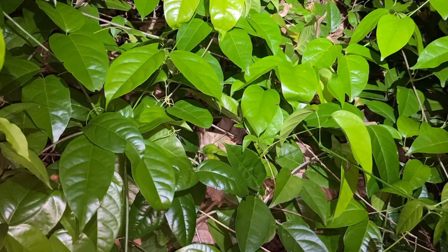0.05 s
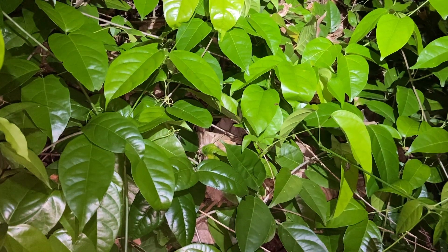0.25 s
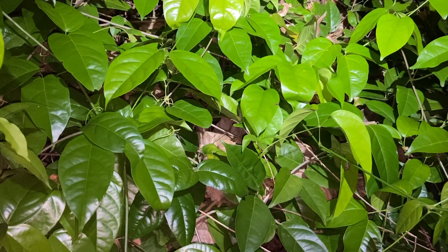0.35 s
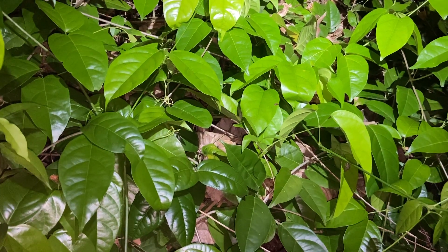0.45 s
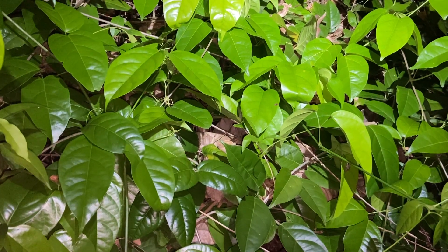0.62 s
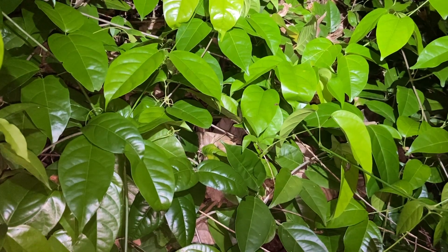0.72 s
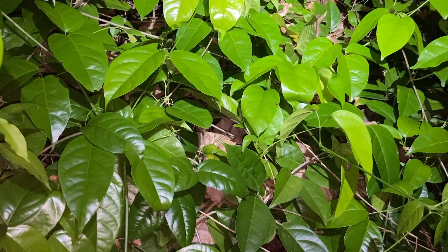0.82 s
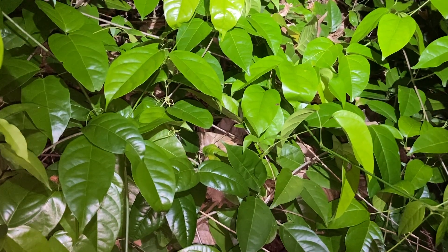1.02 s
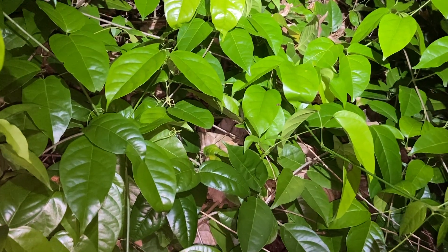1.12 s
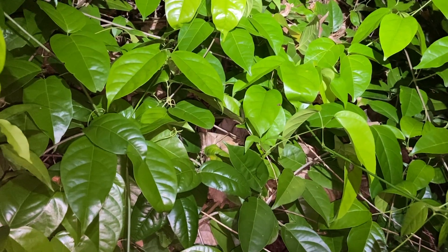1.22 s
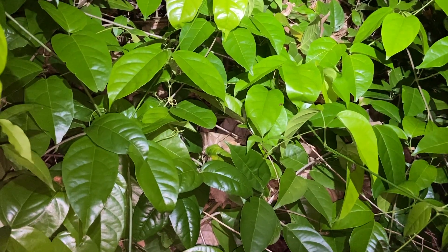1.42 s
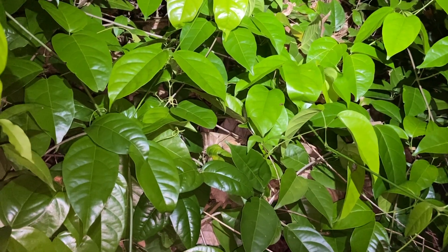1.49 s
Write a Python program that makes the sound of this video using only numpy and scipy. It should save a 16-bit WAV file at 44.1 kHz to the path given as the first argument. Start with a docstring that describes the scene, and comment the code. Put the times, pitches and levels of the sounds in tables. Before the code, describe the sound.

Small frogs whistle among foliage outdoors. One close to the microphone gives a low note, then a louder rising one. Others keep calling from farther off, over a distant chorus and steady high insect buzzing.

```python
"""Tree frogs at night

A frog close by whistles one call with its vocal sac: a nearly flat low note, then a louder rising one.
Other frogs give the same notes from farther off, smeared by leaves and trunks, over a blurred far chorus.
Insects rasp their wings in the treble. Faint hoots and taps, a low rumble and a hum lie underneath."""
import sys
import numpy as np
from scipy import signal
from scipy.fft import rfft, irfft, next_fast_len
from scipy.io import wavfile
from scipy.ndimage import uniform_filter1d, map_coordinates

SR = 44100
rng = np.random.default_rng(int(sys.argv[2]) if len(sys.argv) > 2 else 0)


def master_out(mix):
    """Clip the mix to full scale and print it as 16-bit PCM to the path in sys.argv[1]."""
    frames = np.transpose(np.atleast_2d(mix))
    ceiling = np.clip(frames, -1, 1)
    pcm = np.round(ceiling * 32767).astype(np.int16)
    wavfile.write(sys.argv[1], SR, pcm)


N = 68355


# The near frog's two notes. Each row: time in seconds, pitch in Hz, level in dB.
NEAR_LOW_NOTE = [(.2165, 2130, -44), (.219, 2065, -18.5), (.222, 2045, -15.3), (.228, 2003, -16.8),
                 (.241, 1995, -19.8), (.249, 1945, -24.8), (.255, 1925, -40), (.261, 1920, -56)]
NEAR_RISING_NOTE = [(.2733, 2480, -48), (.275, 2575, -14.5), (.277, 2675, -11.6), (.284, 2785, -11.9),
                    (.293, 2905, -13.6), (.303, 2985, -18.3), (.313, 3050, -25.5), (.319, 3040, -35),
                    (.326, 2950, -55)]
# Their overtones. Each row: multiple of the pitch, level in dB compared with the note.
LOW_OVERTONES = [(2, -25)]
RISE_OVERTONES = [(2, -55.5), (4, -43)]

def near_frog():
    """The frog whistles a low note, then a rising one, each opening with a soft pop."""
    return (pops() + near_note(NEAR_LOW_NOTE, LOW_OVERTONES, pan_db=-1.2, lead=-1.6)
            + near_note(NEAR_RISING_NOTE, RISE_OVERTONES, pan_db=-2, lead=.25))


def near_note(rows, overtones, pan_db, lead):
    """One clean note with little echo; its edges are softly rounded."""
    times, hz, db = np.transpose(rows)
    t = clock()
    gain = amp(np.interp(t, times, db, left=-120, right=-120))
    gain *= 1 + .015 * wobble(250)  # slight roughness
    rounded = uniform_filter1d(uniform_filter1d(gain, size=30), size=22)
    voice = whistle(np.interp(t, times, hz), rounded, overtones)
    return in_foliage(voice, pan_db, lead, echo_db=-28)


# The near frog's pops. Each row: start in seconds, level in dB.
POPS = [(0.216, -34.5), (0.2715, -30.5)]
# Their tone colour. Each row: frequency in Hz, relative level in dB.
POP_COLOUR = [(300, -60.5), (1200, -49), (1700, -16.5), (2100, -1), (2800, 7.5), (3500, -6.5), (4200, -16),
              (5000, -19), (6500, -35.5), (9000, -71)]

def pops(attack_s=.0025, fade_s=.056):
    """A quick burst of noise as each near note starts."""
    t = clock()
    bursts = np.zeros(N)
    for start, db in POPS:
        onset = np.sin(np.pi / 2 * np.clip((t - start) / attack_s, 0, 1)) ** 2
        bursts += onset * amp(db - 60 * np.abs(t - start) / fade_s)
    return bursts * noise(lambda hz: amp(along(POP_COLOUR, hz)), lambda hz: .8)


# Other frogs' low notes. Each row: start in seconds, length in seconds, pitch in Hz, level in dB,
# left minus right in dB, left side's lead in radians, echo compared with the direct sound in dB.
LOW_NOTES = [(.0, .09, 1680, -51.5, 3, 1.5, -0.5), (.125, 0.048, 1610, -41, -2, -2, -5.5),
             (0.311, .02, 2235, -25.5, -3, 0.44, -18.5), (0.351, 0.07, 1698, -27.5, -4, -2, -25.5),
             (0.654, 0.053, 1665, -48.5, -6, 4.5, -1.5), (0.975, .04, 1608, -44, 2, 4, -1.5),
             (1.015, 0.031, 1617, -37.5, -2.5, 4, -8.5), (1.071, 0.086, 1594, -45, -4.5, 3.5, -11.5),
             (1.282, 0.023, 1988, -45.5, 0, 4.5, -10), (1.351, 0.059, 1735, -43, 4, -2.5, -12),
             (1.374, 0.029, 2003, -45.5, -2, 1, -6), (1.419, .045, 1715, -53, -4, 4.5, -18)]
# Their overtone. Each row: multiple of the pitch, level in dB compared with the note.
OTHER_OVERTONES = [(2, -33.5)]
# Rising notes. Each row: as for the low notes, but with a first and a last pitch in Hz.
RISING_NOTES = [(0.305, 0.023, 2540, 2590, -30, 0, 1.3, -9), (0.327, 0.027, 2598, 2820, -37.5, 3, 2, -8),
                (0.345, 0.035, 2866, 3030, -29.5, 4.5, 2, -9), (0.373, 0.021, 3220, 3310, -40, 2, 0, -2),
                (0.367, .025, 3400, 3820, -47.5, 3, 0, 14), (0.523, 0.046, 2810, 3114, -33.5, 2.5, 2, -5),
                (0.572, 0.031, 3170, 3253, -30.5, 4.5, 2.5, -6.5),
                (.775, 0.034, 2780, 3060, -38.5, 8, -0.2, 4), (.835, 0.023, 2900, 3184, -38, 3.5, 2, 6.5),
                (.892, .035, 2880, 3186, -32, 2.5, -0.5, 3), (1.187, .04, 2540, 2760, -35, -2, 0.8, 4),
                (1.228, .03, 2790, 3077, -31, 5, -0.4, 1), (1.246, .022, 3350, 3770, -47.5, 16, 1, 9)]
# Falling chirps. Each row: start and length in seconds, first and last pitch in Hz, level in dB.
CHIRPS = [(0.709, 0.02, 2550, 1910, -34.5), (0.837, 0.028, 2500, 1954, -38),
          (1.357, 0.0186, 2600, 1950, -40.5)]

def other_frogs(sag=.0571, bend=1.36):
    """Frogs all around whistle sagging low notes, rising notes and falling chirps through the leaves."""
    out = np.zeros((2, N))
    for start, length, hz, db, pan_db, lead, echo_db in LOW_NOTES:
        progress, gain = note(start, length)
        voice = whistle(hz * (1 - sag * progress), amp(db) * gain, OTHER_OVERTONES)
        out += in_foliage(voice, pan_db, lead, echo_db)
    for start, length, first_hz, last_hz, db, pan_db, lead, echo_db in RISING_NOTES:
        progress, gain = note(start, length, attack_s=.0044, release_s=.0063, fade_db=-.5)
        hz = last_hz + (first_hz - last_hz) * (1 - progress) ** bend
        out += in_foliage(whistle(hz, amp(db) * gain * flutter()), pan_db, lead, echo_db)
    for start, length, first_hz, last_hz, db in CHIRPS:
        progress, gain = note(start, length)
        hz = first_hz + (last_hz - first_hz) * progress
        out += in_foliage(whistle(hz, amp(db) * gain * flutter()), 0, 0, echo_db=3.5)
    return out


# The far chorus's tone colour. Each row: frequency in Hz, relative level in dB.
CHORUS_COLOUR = [(1250, -65.5), (1450, -29.5), (1550, -12), (1690, -11.5), (1780, -33), (1980, -2),
                 (2200, -13.5), (2550, -13), (2950, 0), (3280, -3), (3450, -20), (3700, -35.5),
                 (4150, -17.5), (4600, -43.5), (5500, -71.5)]
# Its spread. Each row: frequency in Hz, how alike left and right are (1 same, -1 opposite).
CHORUS_ALIKE = [(1500, -0.49), (1750, -.3), (2000, -0.088), (2400, .5), (2900, 0.32), (3300, 0.22),
                (3700, 0.3), (4600, .35)]

def far_chorus(level_db=-43.5):
    """Countless frogs blur into bands of noise at the pitches of their two notes."""
    blur = noise(lambda hz: amp(along(CHORUS_COLOUR, hz)), lambda hz: along(CHORUS_ALIKE, hz))
    return blur * amp(level_db - .04 * wobble(8.9))


# The cricket crowd. Each row: centre in Hz, width in Hz, level in dB,
# how alike left and right are, left side's lead in radians.
CRICKET_BANDS = [(5836, 222, -61, 0.34, -2.1), (6417, 200, -52, 0.41, 0.5), (7020, 85, -53, 0.26, .3)]
# Single crickets. Each row: pitch in Hz, level in dB.
SINGLE_CRICKETS = [(5693, -72), (6210, -66.5), (6370, -61.5), (6792, -65), (6946, -65), (7098, -67.5),
                   (7189, -68), (15105, -72)]

def crickets(waver_hz=18):
    """Many rasping wings ring in a few bands; single crickets stand out as thin wavering tones."""
    out = np.zeros((2, N))
    for centre, width, db, alike, lead in CRICKET_BANDS:
        band = noise(lambda hz: (1 + ((hz - centre) / width) ** 2 / 12) ** -3, lambda hz: alike, lead)
        out += band * amp(db + 1.5 * wobble(64))
    for hz, db in SINGLE_CRICKETS:
        waver = unit(wobble(waver_hz) + 1j * wobble(waver_hz))
        tone = whistle(np.full(N, hz), amp(db) * waver)
        out += (tone * stereo(0, rng.normal(0, .6))).real
    return out


# A nearer bush cricket's tone colour. Each row: frequency in Hz, relative level in dB.
RASP_COLOUR = [(6500, -25.5), (7100, 3), (7520, -6), (7950, 2), (8350, -1.5), (8700, -22.5), (9050, -37),
               (9400, -50.5), (10300, -50), (11200, -24), (12200, -19), (13000, -11), (13700, -10),
               (14400, -10), (14850, -5), (15150, -7), (15700, -13.5), (16000, -32.5)]

def bush_cricket(level_db=-51, stroke_hz=39.3):
    """A steady broad rasp from the right, faintly pulsed by the wing strokes."""
    rasp = noise(lambda hz: amp(along(RASP_COLOUR, hz)), lambda hz: .94, lead=-2.06, lag_s=.0002399)
    strokes_db = .7 * np.sin(2 * np.pi * stroke_hz * clock())
    return rasp * amp(level_db + strokes_db + .6 * wobble(50))


# Far hoots. Each row: start in seconds, length in seconds, level in dB.
HOOTS = [(.0, 0.095, -71), (0.118, 0.039, -69)]

def hoots(pitch_hz=1081):
    """A far animal gives two faint, even notes, heard mostly as echo."""
    gain = sum(amp(db) * note(start, length, fade_db=0)[1] for start, length, db in HOOTS)
    return in_foliage(whistle(np.full(N, pitch_hz), gain), 0, 0, echo_db=8)


# Soft taps. Each row: start in seconds, level in dB.
TAPS = [(1.306, -61), (1.334, -60), (1.445, -57)]

def taps(centre_hz=337, fade_s=.047):
    """Dull little knocks, perhaps drips landing on leaves."""
    t = clock()
    bursts = sum((t >= start) * amp(db - 60 * np.abs(t - start) / fade_s) for start, db in TAPS)
    return bursts * noise(lambda hz: (1 + (hz / centre_hz - 1) ** 2) ** -2, lambda hz: .7)


# Tone colours of the rumble and the air. Each row: frequency in Hz, relative level in dB.
RUMBLE_COLOUR = [(15, -23.5), (30, -23), (50, 1), (70, -1.5), (120, -6), (170, -21.5), (350, -26.5),
                 (800, -63)]
AIR_COLOUR = [(60, -4), (170, -6), (350, -0.5), (650, -13), (1300, -15), (5000, -6.5), (8300, -9.5),
              (9200, -46.5), (16000, -44)]
# The spread of both. Each row: frequency in Hz, how alike left and right are.
RUMBLE_ALIKE = [(60, 0.78), (150, 0.81), (450, 0.51), (900, 0.76), (5000, 0)]
# How the rumble and the hum swell and fade. Each row: time in seconds, level in dB.
RUMBLE_LEVEL = [(0, -55), (.05, -57), (.1, -59), (.25, -65.5), (.34, -58.5), (0.419, -64), (.53, -53.5),
                (.6, -62.5), (.74, -53), (.87, -63), (1.0, -59.5), (1.12, -63.5), (1.249, -63),
                (1.36, -60.5), (1.55, -60.5)]
HUM_LEVEL = [(0, -65), (.2, -57.5), (.45, -63.5), (0.719, -52), (.83, -59.5), (.92, -70), (1.15, -70.5),
             (1.24, -58.5), (1.32, -64), (1.431, -55), (1.55, -52)]

def rumble(air_db=-64.5, hum_hz=89):
    """Low outdoor rumble, soft air and a hum, perhaps from a far engine."""
    alike = lambda hz: along(RUMBLE_ALIKE, hz)
    swell = lambda rows: amp(np.interp(clock(), *np.transpose(rows)))
    low = swell(RUMBLE_LEVEL) * noise(lambda hz: amp(along(RUMBLE_COLOUR, hz)), alike)
    air = amp(air_db + wobble(10)) * noise(lambda hz: amp(along(AIR_COLOUR, hz)), alike)
    hum = whistle(hum_hz + .88 * wobble(5), swell(HUM_LEVEL)).real
    return low + air + hum


def whistle(hz, gain, overtones=()):
    """An almost pure tone, as complex numbers; overtones show where it is loudest."""
    phase = 2 * np.pi * np.cumsum(hz) / SR
    effort = (np.abs(gain) / (np.abs(gain).max() + 1e-12)) ** 1.6
    upper = sum(amp(db) * np.exp(1j * round(multiple) * phase) for multiple, db in overtones)
    return np.sqrt(2) * gain * (np.exp(1j * phase) + effort * upper)


def note(start, length, attack_s=.0069, release_s=.042, fade_db=2.5):
    """How far along a note is (0 to 1), and its gain as it opens, holds and closes."""
    t = clock() - start
    progress = np.clip(t / length, 0, 1)
    gate = np.clip(t / attack_s, 0, 1) * np.clip((length - t) / release_s + .5, 0, 1)
    return progress, np.sin(np.pi / 2 * gate) ** 2 * amp(-fade_db * progress)


def in_foliage(voice, pan_db, lead, echo_db, fade_s=.31, delay_s=.0088):
    """Share a voice's power between the direct sound and its echo off leaves and trunks."""
    t = np.arange(SR // 2) / SR
    tail = rng.standard_normal((2, len(t))) * amp(-60 * t / fade_s) * (t > delay_s)
    echo = signal.fftconvolve(voice.real[None], tail, axes=1)[:, :N]
    echo = np.array([unit(side) for side in echo]) * voice.real.std()
    direct = (voice * stereo(pan_db, lead)).real
    return (direct + amp(echo_db) * echo) / np.hypot(1, amp(echo_db))


def flutter(depth=.92, rate_hz=192.2):
    """Many paths through the leaves beat against each other and break up a gliding note."""
    return unit(1 + depth * (wobble(rate_hz) + 1j * wobble(rate_hz)))


def noise(gain, alike, lead=0, lag_s=0):
    """Stereo noise of power 1; gain and likeness depend on frequency, and the left side may lag."""
    def shape(hz):
        spread = np.arccos(np.clip(alike(hz), -1, 1)) / 2 * np.ones_like(hz)
        return gain(hz) * np.array([np.cos(spread), np.sin(spread)])
    mid, side = filtered(rng.standard_normal((2, N)), shape)
    left_right = np.array([mid + side, mid - side])
    return unit(filtered(left_right, lambda hz: stereo(0, lead - 2 * np.pi * hz * lag_s)))


def stereo(pan_db, lead):
    """Left and right gains: the left is pan_db louder and its wave is lead radians ahead."""
    side = np.array([[.5], [-.5]])
    return amp(side * pan_db) * np.exp(1j * side * lead)


def filtered(x, response):
    """Multiply each frequency in x by its response."""
    size = next_fast_len(N + SR // 2)
    return irfft(rfft(x, size) * response(np.fft.rfftfreq(size, 1 / SR)), size)[..., :N]


def wobble(rate):
    """A smooth curve through rate random points a second."""
    return map_coordinates(rng.standard_normal(int(N * rate / SR) + 4), [clock() * rate], mode="nearest")


def along(rows, hz):
    """Read between a table's rows on a log frequency scale."""
    row_hz, values = np.transpose(rows)
    return np.interp(np.log(hz + 1), np.log(row_hz + 1), values)


def amp(db):
    """Turn decibels into gain."""
    return 10 ** (np.asarray(db) / 20)


def unit(x):
    """Scale to an average power of 1."""
    return x / np.sqrt(np.mean(np.abs(x) ** 2) + 1e-20)


def clock():
    """The time of each sample in seconds."""
    return np.arange(N) / SR


def scene():
    """Frogs near and far over insects and rumble."""
    frogs = near_frog() + other_frogs() + far_chorus()
    return frogs + hoots() + taps() + crickets() + bush_cricket() + rumble()


def record(dry, top_hz=15800):
    """Cut off the very highest treble."""
    return filtered(dry, lambda hz: hz < top_hz)


dry = scene()
out = record(dry)
master_out(out)
```